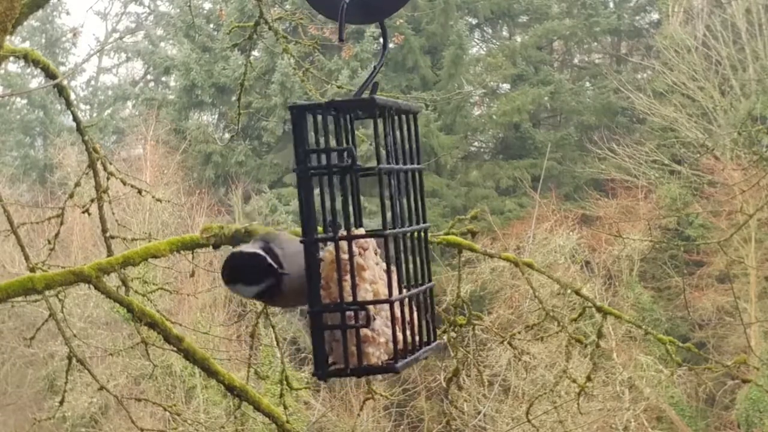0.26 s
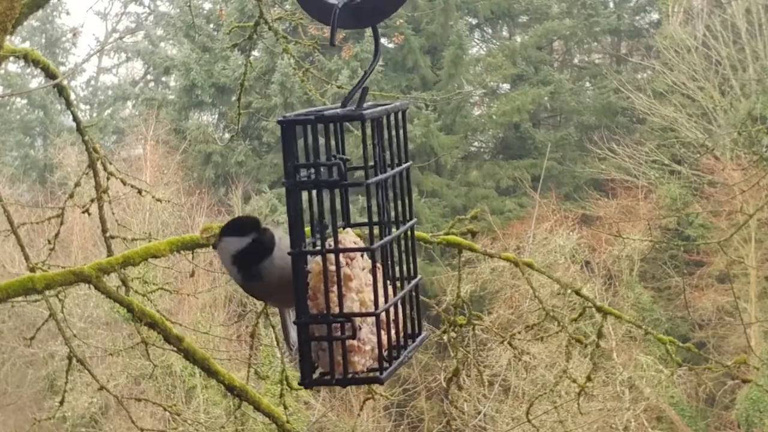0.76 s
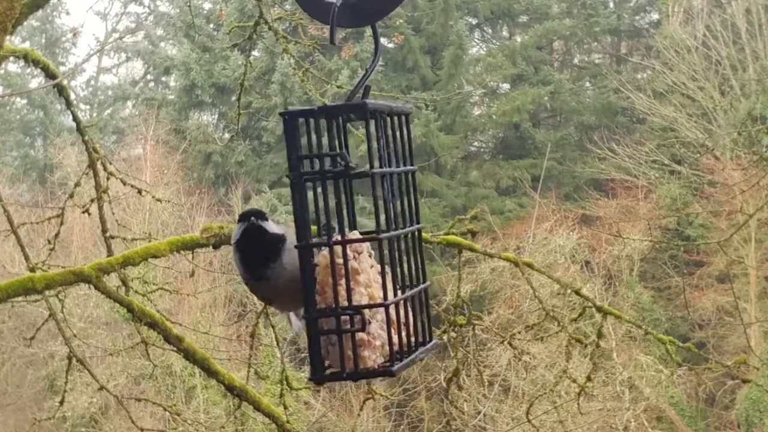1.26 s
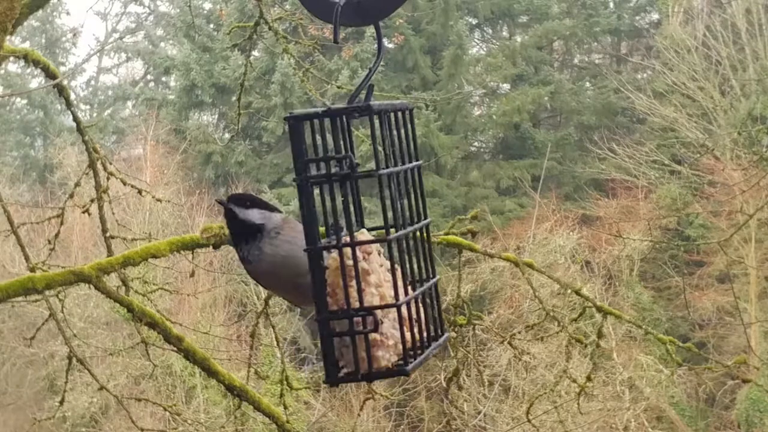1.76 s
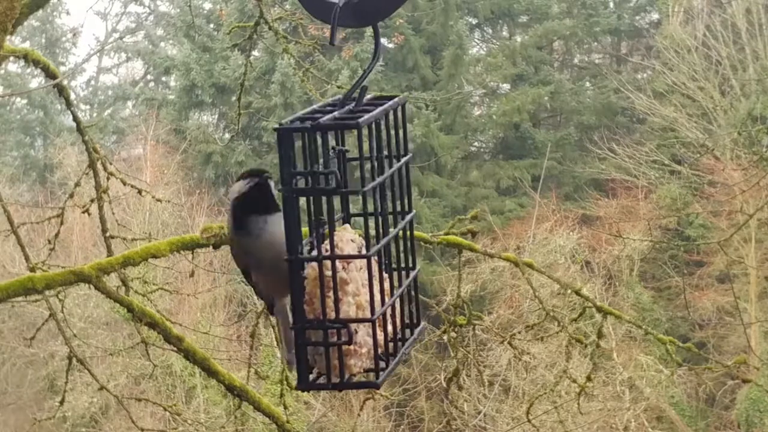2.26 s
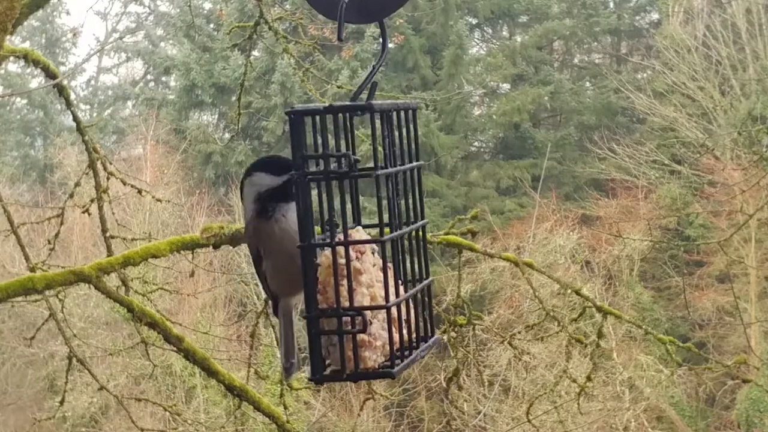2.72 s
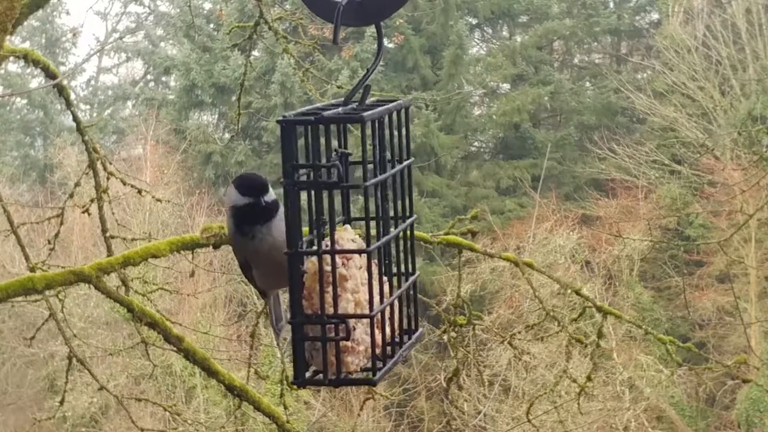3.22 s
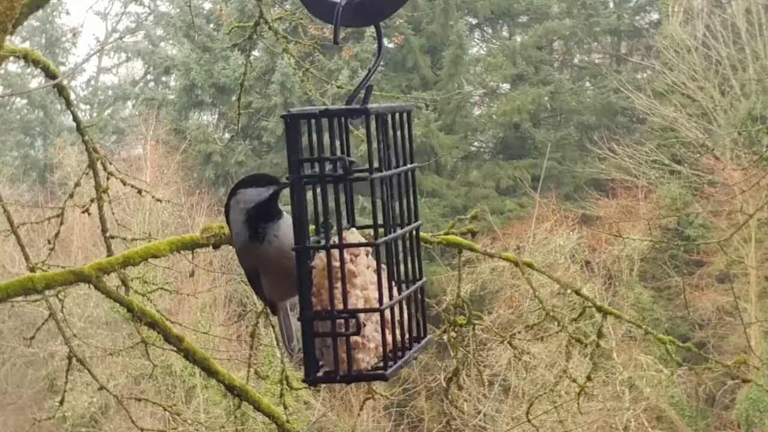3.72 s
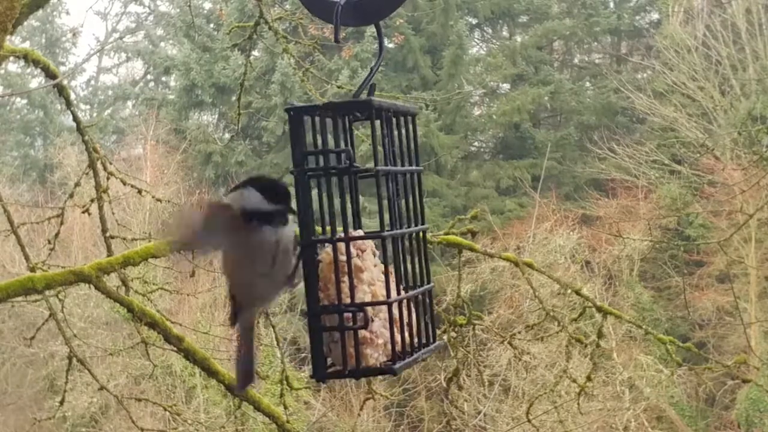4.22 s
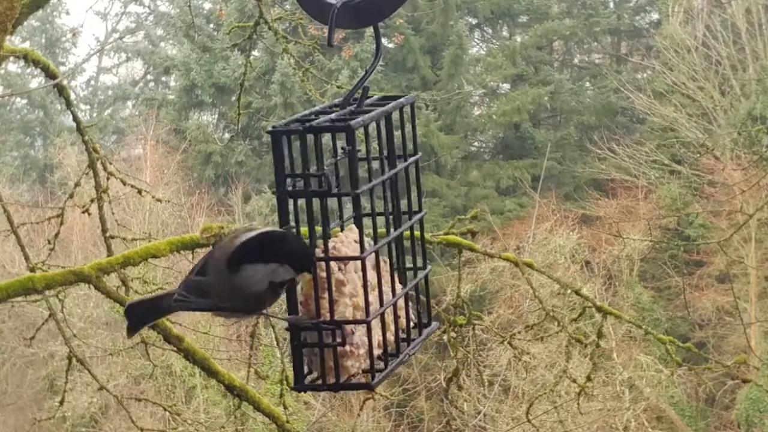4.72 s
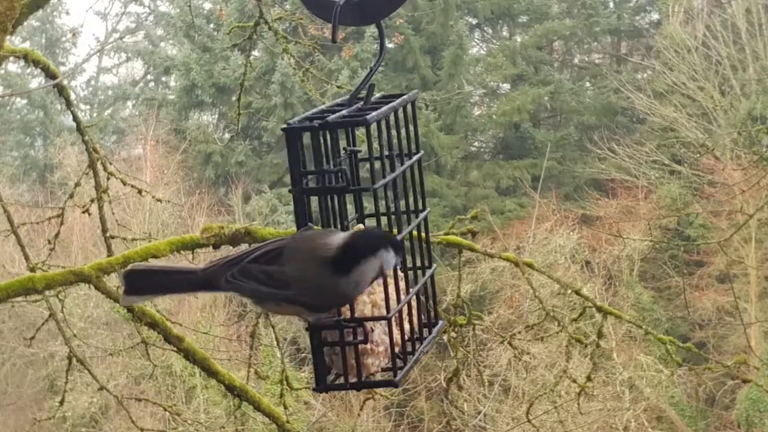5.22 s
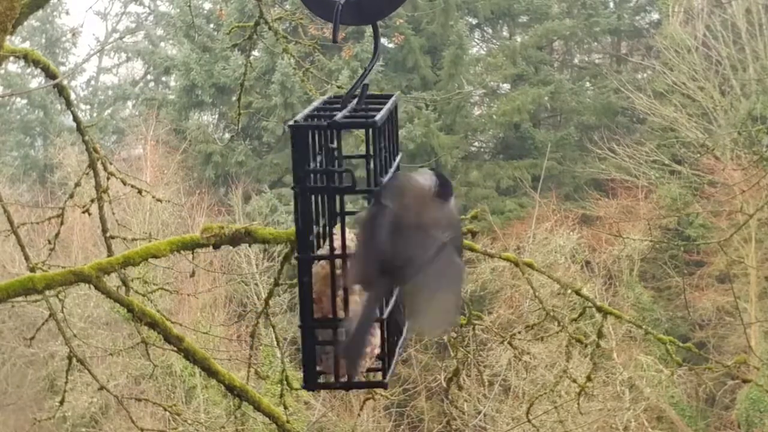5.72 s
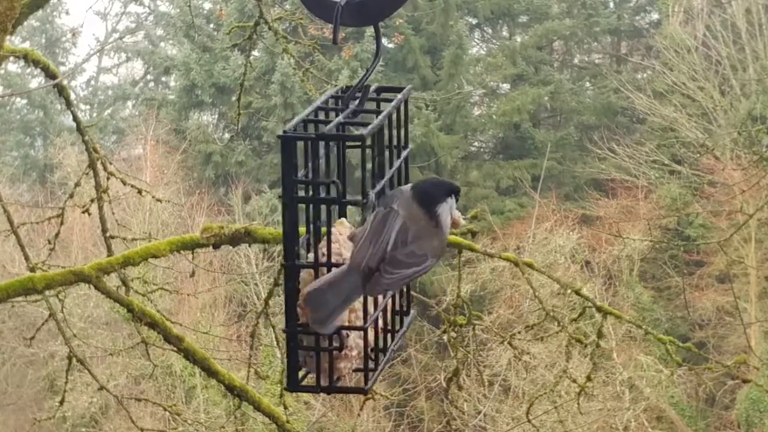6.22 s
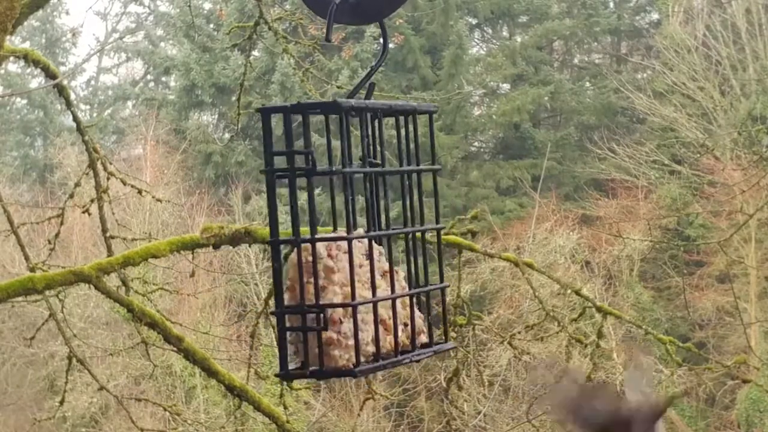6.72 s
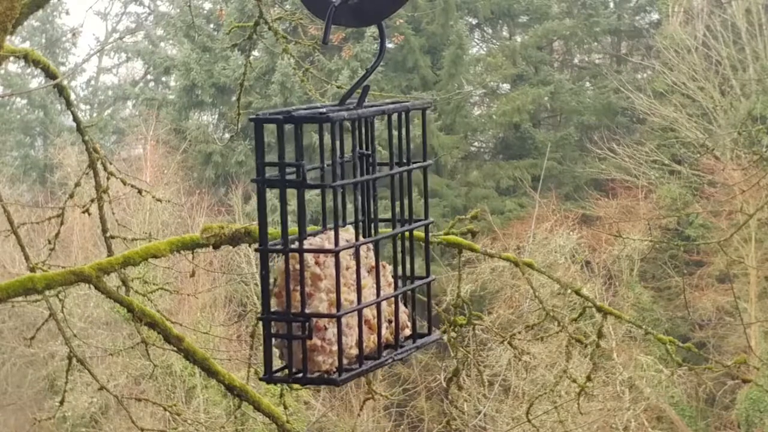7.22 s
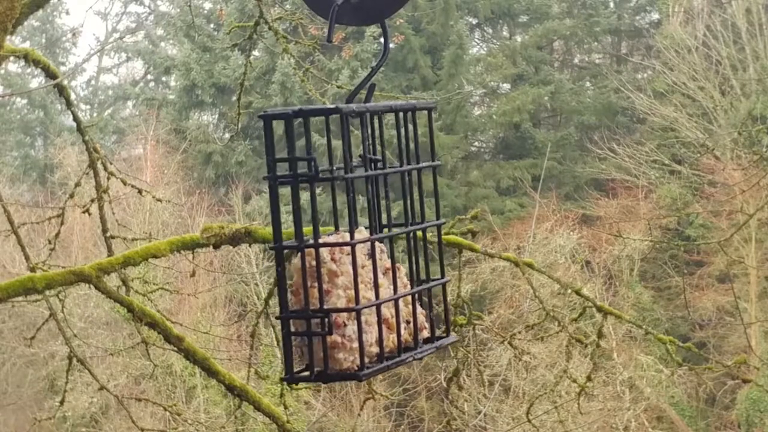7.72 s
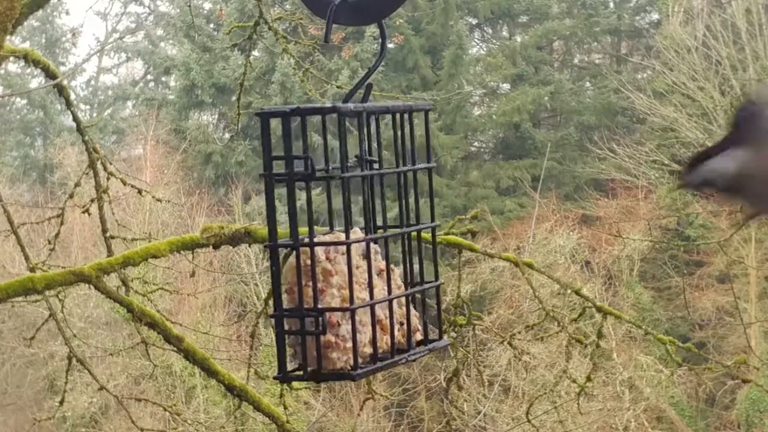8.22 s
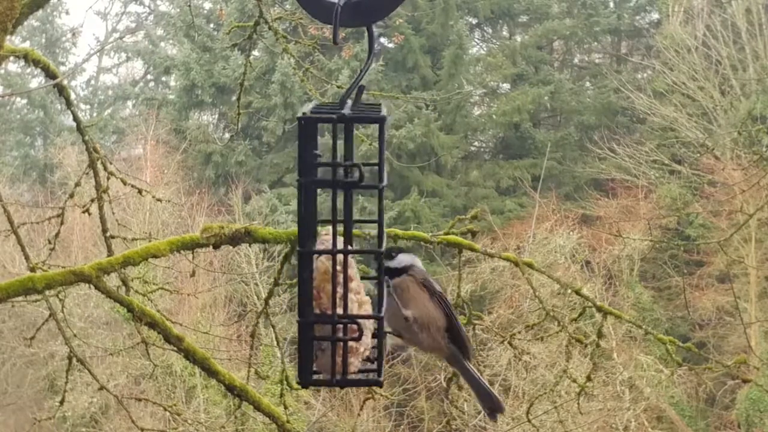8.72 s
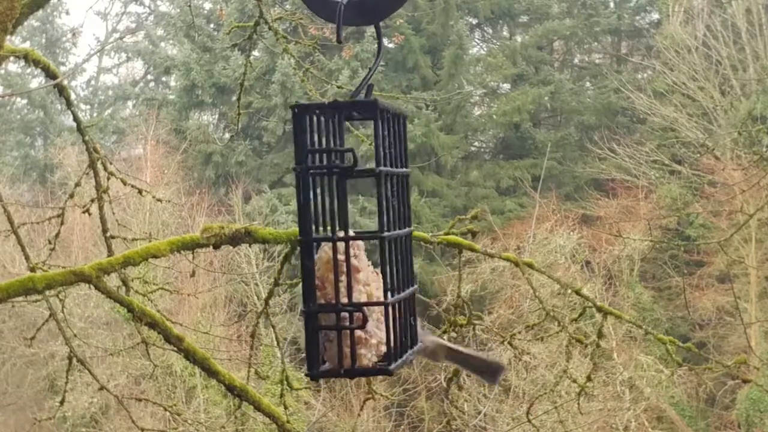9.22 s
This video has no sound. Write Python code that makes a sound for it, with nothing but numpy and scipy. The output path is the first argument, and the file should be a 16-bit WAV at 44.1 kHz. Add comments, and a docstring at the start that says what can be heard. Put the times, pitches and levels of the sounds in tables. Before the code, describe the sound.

Over the steady low roar of a far road, small birds close to the microphone sound thin, high notes, a brief gargle ending in a trill and whistle, and light ticks among trees. Occasional dull knocks on the microphone's housing come in between. The calls stop a little past halfway, leaving faint feather rustles on a wire cage and the swelling noise of a car drawing nearer.

```python
"""Chickadees at a suet cage in a wood

The birds' syrinxes sound thin tsit notes, sharp ticks and one gargled phrase, and the trees scatter
a brief echo. Claws and wings rustle on the wire, and soft knocks ring the shell of a nearby camera,
whose two microphone ports hear the scene. Behind, a distant road roars steadily as broadband noise;
one car passes far off, and towards the end another draws nearer."""
import sys
import numpy as np
from scipy import signal
from scipy.fft import rfft, irfft, next_fast_len
from scipy.io import wavfile
from scipy.ndimage import map_coordinates

SR = 44100
rng = np.random.default_rng(int(sys.argv[2]) if len(sys.argv) > 2 else 0)


def store_wav(level_fs):
    """Save 16-bit WAV to argv[1]."""
    pcm = np.round(np.clip(np.atleast_2d(level_fs), -1, 1) * 32767)
    wavfile.write(sys.argv[1], SR, pcm.T.astype(np.int16))


N = 417186

# Friction spectrum of feathers: frequency_hz, density_db
FEATHER_SPECTRUM = [(2500, -30), (4000, -6.5), (5500, -10), (7400, -3), (8900, -13), (10500, -4.5),
                    (13000, 0), (15000, -13)]
# Treble noise at the two ports: frequency_hz, left_over_right_db, coherence, left_lead_rad
TREBLE_PORTS = [(5195, -0.5, 0.00752, 0.0033), (7180, 4.5, 0.0028, 0.0066), (10240, 1.5, 0.0043, 0.0027),
                (12870, -9.5, 0.004, 0.0022)]


def amp(db):
    """Amplitude ratio of a level in decibels."""
    return 10 ** (np.asarray(db) / 20)


def unit(x):
    """Normalisation to an rms of 1."""
    return x / np.sqrt(np.mean(x ** 2) + 1e-20)


def along(points, hz):
    """Interpolation of each column of (frequency_hz, ...) rows on a logarithmic frequency axis."""
    knots_hz, *columns = np.transpose(points)
    return np.array([np.interp(np.log(hz + 1), np.log(knots_hz + 1), c) for c in columns])


def wobble(knots_per_s, size):
    """Smooth random modulation: a spline through Gaussian values."""
    knots = rng.standard_normal(int(size * knots_per_s / SR) + 4)
    return map_coordinates(knots, [np.arange(size) * knots_per_s / SR])


def filtered(x, response):
    """Linear filtering: the spectrum is multiplied by a frequency response."""
    size = next_fast_len(x.shape[-1] + 8192)
    return irfft(rfft(x, size) * response(np.fft.rfftfreq(size, 1 / SR)), size)[..., :x.shape[-1]]


def add(track, start_s, sound):
    """Superposition of a sound on a track."""
    part = track[:, max(round(start_s * SR), 0):][:, :sound.shape[-1]]
    part += sound[..., :part.shape[-1]]


def port_noise(spectrum, ports, ripple_db=1.5):
    """Partially coherent coloured noise at the two ports; their mean has an rms of 1."""
    size = next_fast_len(N)
    hz = np.fft.rfftfreq(size, 1 / SR)
    common, independent = rfft(rng.standard_normal((2, size)))
    balance_db, coherence, lead_rad = along(ports, hz)
    coherence, ratio = np.clip(coherence, 0, .995), amp(balance_db)
    left = ratio * np.exp(1j * lead_rad) * common
    right = coherence * common + np.sqrt(1 - coherence ** 2) * independent
    sum_gain = np.sqrt(1 + ratio ** 2 + 2 * ratio * coherence * np.cos(lead_rad))
    skirts = np.minimum(hz / spectrum[0][0], 1) ** 6 / np.maximum(hz / spectrum[-1][0], 1) ** 20
    # reflections from ground and trunks ripple the spectrum
    colour = amp(along(spectrum, hz) + ripple_db * wobble(100.35, len(hz))) * skirts
    pair = irfft(np.array([left, right]) * colour / sum_gain, size)[:, :N]
    return pair / np.std(pair.mean(axis=0))


def passing(closest_s, distance_s, peak_db, trees_db_per_s=1.2):
    """Spherical spreading and screening by trees set a car's gain; distance is in seconds of travel."""
    range_s = np.hypot(np.arange(N) / SR - closest_s, distance_s)
    return amp(peak_db - trees_db_per_s * (range_s - distance_s)) * distance_s / range_s


def traffic(rumble_db=-41.5, roar_db=-35, tyre_db=-59):
    """Incoherent sources add in power: a steady road, a far car, then a near one with brighter tyres."""
    # Spectra of engine rumble, road roar, tyre hiss and tread sizzle: frequency_hz, density_db
    engine = [(32, -14), (45, -5.5), (60, -1.5), (74, -3), (87, 3.5), (98, -5.5), (130, -6), (185, -13.5),
              (230, -7), (300, -25.5)]
    far_roar = [(170, -35), (255, -13.5), (300, -7.5), (350, -9.5), (410, -6), (490, -10.5), (540, -3.5),
                (620, -2.2), (670, 2.04), (735, 1.3), (800, -2.5), (860, -6.5), (930, -7.5), (1020, -19.5),
                (1300, -64.5)]
    near_roar = [(170, -8.5), (250, -10.5), (310, -4), (380, -4.5), (475, 0.7), (560, -1), (610, 2.5),
                 (680, -2), (735, -4.5), (810, -5), (900, -12.5), (1050, -16), (1300, -44)]
    far_tyres = [(850, -38), (1080, 6), (1220, -4), (1400, -1.5), (1520, -8), (1700, -0.5), (1820, -8.5),
                 (1980, -4.5), (2500, -15), (3000, -25), (4000, -55.5), (5200, -55.5), (7500, -44)]
    near_tyres = [(850, -18), (1060, 4.5), (1250, 2), (1500, -1.5), (1740, -4), (2050, -2), (2380, -5.5),
                  (2900, -17), (4000, -31), (5200, -29), (7500, -26.5), (10500, -42.5), (13000, -41)]
    near_tread = [(1700, -10), (2250, 15.5), (2900, -5.5), (3400, -6.5), (3950, 1), (4600, -6.5),
                  (5400, -13), (6500, -3.5), (7500, -7), (9000, -20.5), (12500, -12.5)]
    # Paths to the two ports: frequency_hz, left_over_right_db, coherence, left_lead_rad
    far_ports = [(60.0, 2.4, 0.99, -0.0), (300.0, 2.4, 0.99, -0.1), (430.0, 2.9, 0.94, -0.1),
                 (580.0, 9.2, 0.82, -0.2), (700.0, 12.7, 0.64, 0.5), (820.0, 13.4, 0.49, -2.0),
                 (1100.0, 5.5, 0.4, -4.0), (1500.0, 6.7, 0.69, -4.0), (2200.0, 1.8, 0.44, -6.3),
                 (3000.0, 1.1, 0.18, -9.5), (7000, -2, 0.1, -9.5)]
    near_ports = [(60.0, 2.2, 0.99, -0.1), (300.0, 2.4, 0.98, -0.2), (430.0, 5.9, 0.92, -0.4),
                  (580.0, 9.8, 0.62, -1.9), (700.0, 7.2, 0.73, -2.4), (820.0, 3.9, 0.82, -2.8),
                  (1100.0, 3.1, 0.59, -3.0), (1500.0, 2.4, 0.37, -3.6), (2200.0, 5.2, 0.5, -6.4),
                  (3000.0, 1.9, 0.36, -3.4), (5200.0, -0.9, 0.09, -3.4), (7300.0, -7.2, 0.16, -3.4)]
    rumble_gain = np.hypot(amp(rumble_db), passing(closest_s=9.365, distance_s=.854, peak_db=-38))
    rumble = rumble_gain * port_noise(engine, far_ports, ripple_db=.5)
    roar_gain = np.hypot(amp(roar_db), passing(4.73, 2.03, -30.5))
    roar = roar_gain * port_noise(far_roar, far_ports, ripple_db=-.5)
    roar += passing(9.35, .69, -24) * port_noise(near_roar, near_ports, ripple_db=1)
    tyre_gain = np.hypot(amp(tyre_db), passing(5.27, 3.2, -48.5))
    tyres = tyre_gain * port_noise(far_tyres, far_ports, ripple_db=3.5)
    tyres += passing(9.13, 1.58, -43) * port_noise(near_tyres, near_ports, ripple_db=2)
    # the fine sizzle of the tread carries only once the car is close
    tread = passing(9.68, .313, -41.5) * port_noise(near_tread, near_ports)
    waver = amp(.7 * wobble(12, N))
    return rumble + waver * roar + tyres + tread


def hiss(level_db=-67.5):
    """A faint floor of stationary treble noise, almost incoherent between the ports."""
    # Spectrum of the hiss: frequency_hz, density_db
    spectrum = [(2500, 6.5), (3800, 6.5), (5400, -2.5), (7500, 2), (8900, -3), (10400, -5), (12500, 2),
                (13600, -6)]
    return amp(level_db) * port_noise(spectrum, TREBLE_PORTS)


def syrinx(hz, db, overtone_db, jitter, rough=0, second_voice=0, beat_hz=0):
    """A harmonic oscillator: random modulation roughens it, and a second voice beats against it."""
    size = len(hz)
    pull_rad, beat_drift, flutter_per_s = .22, .06, 2400
    hz = hz * (1 + jitter * wobble(650, size))
    beat_phase = 2 * np.pi * np.cumsum(beat_hz * (1 + beat_drift * wobble(400, size))) / SR
    # the two voices bend each other's phase
    coupling = np.exp(1j * second_voice * pull_rad * signal.sawtooth(beat_phase, .2))
    beat = (1 + second_voice * np.exp(1j * beat_phase)) * coupling
    voice = np.exp(2j * np.pi * np.cumsum(hz) / SR) * beat
    flutter = wobble(flutter_per_s, size) + 1j * wobble(flutter_per_s, size)
    grain = (1 + rough * flutter) / np.sqrt(1 + 2 * rough ** 2)
    tone = sum(amp(level) * np.imag(grain * voice ** k) * (k * hz < SR / 2)
               for k, level in enumerate([0, *overtone_db], 1))
    return np.sqrt(2) * amp(db) * tone * signal.windows.tukey(size, .04)


def in_woods(note, pan_db, lead_rad, echo_db, twig_t60_s=.04, near_t60_s=.15, trunk_t60_s=.39):
    """Direct sound, early reflections and scattering by trees; positive pan and lead favour the left."""
    # Reflections from cage and branch: delay_s, level_db
    surfaces = [(.0037, -8), (.0092, -7)]
    t = np.arange(int(.35 * SR)) / SR
    twigs = amp(4 - 60 * t / twig_t60_s)
    trunks = amp(echo_db - 13 - 60 * t / trunk_t60_s)  # the long tail belongs to distant birds
    decay = (twigs + amp(-60 * t / near_t60_s) + trunks) * (t > .0015)
    tail = rng.standard_normal((2, len(t))) * decay / np.linalg.norm(decay)
    for delay_s, db in surfaces:
        tail[:, round(delay_s * rng.uniform(.85, 1.15) * SR)] += amp(db)
    tail = filtered(tail, lambda hz: 1 / np.sqrt(1 + (hz / 13000) ** 10))  # air and leaves absorb
    sides = amp(np.array([[pan_db], [-pan_db]]) / 2)
    direct = np.real(signal.hilbert(note) * np.exp(.5j * np.array([[lead_rad], [-lead_rad]])))
    heard = amp(echo_db) * signal.fftconvolve(note[None], tail, axes=1) * unit(np.sqrt(sides))
    heard[:, :len(note)] += direct * unit(sides)
    return heard


def contact_calls(notes, contour, overtone_db, lead_rad, pure_below_db, cut_db_per_octave=45):
    """Frequency sweeps on one contour; the oscillation dies away below each note's lowest pitch."""
    out = np.zeros((2, N))
    for start_s, length_s, top_hz, low_hz, db, pan_db, echo_db, *manner in notes:
        pitch_ratio, swell_db, bright_db, rough = contour(length_s, *manner)
        hz = top_hz * pitch_ratio
        fade_db = cut_db_per_octave * np.minimum(np.log2(hz / low_hz), 0)
        purity_db = 2 * min(db - pure_below_db, 0)  # soft notes are purer
        overtones = [level + purity_db + bright_db for level in overtone_db]
        note = syrinx(hz, db + swell_db + fade_db, overtones, jitter=.006, rough=rough)
        add(out, start_s, in_woods(note, pan_db, lead_rad, echo_db))
    return out


def tsit_contour(length_s, dip_db, accent_db, rough, climb_per_s=2.3, plunge_s=.0046, end_ratio=.52):
    """Modulation of a tsit: the pitch climbs, eases off, then plunges with a rough accent."""
    t = np.arange(int(length_s * SR)) / SR
    late_s = t - (length_s - plunge_s)
    plunge = np.clip(late_s / plunge_s, 0, 1)
    pitch_ratio = 1 - climb_per_s * length_s * (1 - t / length_s) ** 2 - (1 - end_ratio) * plunge ** 1.22
    dip = np.exp(-((late_s + .0045) / .0033) ** 2)
    accent = np.exp(-(late_s / .0016) ** 2)
    attack_db = -30 * np.exp(-t / .001)
    swell_db = attack_db - dip_db * dip + accent_db * accent - 23 * plunge ** 4
    break_up = np.maximum(np.exp(np.minimum(late_s, 0) / .004), .2)
    return pitch_ratio, swell_db, 0, rough * break_up


def tsits():
    """Source and filter: the nearly closed beak favours the top of each thin note from the syrinx."""
    # Notes: start_s, length_s, top_hz, low_hz, level_db, pan_db, echo_db, dip_db, accent_db, roughness
    notes = [(.105, .0245, 7850, 6800, -19, -4, -15, 2, 1, .2),
             (.826, .023, 7700, 6100, -22.7, -5, -16, 3, -3, .3),
             (1.759, .0255, 7780, 6000, -25.5, -2, -13, 4, 3, .25),
             (2.325, .04, 7400, 6500, -69, 0, -2, 0, 0, .1), (2.405, .03, 7200, 6500, -67, 0, -2, 0, 0, .1),
             (2.815, .05, 7800, 6300, -42, -10, 0, 2, -3, .5),
             (3.547, .0245, 7700, 5400, -21.5, -5, -14, 9, 2, .3),
             (4.776, .010, 7500, 7100, -47, -4, -6, 0, 0, .1),
             (4.844, .011, 7400, 7100, -50, -4, -6, 0, 0, .1),
             (5.3155, .0245, 7780, 4200, -24, -2, -11, 4, 3, .45),
             (5.713, .047, 7800, 6000, -37, -11, -4.5, 3, -3, .5)]
    # Response of the beak: frequency_hz, gain_db
    beak = [(4200, -1), (5200, -3.5), (6200, -4), (7200, -1), (7800, 1), (8400, -9), (9200, -4), (10400, 6),
            (12000, -1), (13600, -4), (15300, 2)]
    source = contact_calls(notes, tsit_contour, overtone_db=[-22.5], lead_rad=-1.9, pure_below_db=-30)
    return filtered(source, lambda hz: amp(along(beak, hz)))


def knocks(shell_hz=670, rise_s=.0016, ring_db=-17, t60_s=.073):
    """Damped resonance: each soft knock rings the camera's shell, mostly on the left."""
    # Impacts on the shell: start_s, level_db
    impacts = [(0.327, -9), (1.9785, -13.5), (4.866, -16), (5.602, -16.5), (6.556, -18), (9.402, -7)]
    out, t = np.zeros((2, N)), np.arange(SR // 20) / SR
    push = (t / rise_s) ** 2 * np.exp(2 - 2 * t / rise_s)
    ring = (push + amp(ring_db - 60 * t / t60_s)) * np.sin(2 * np.pi * shell_hz * t)
    for start_s, db in impacts:
        add(out, start_s, amp(db) * amp([[0], [-12]]) * ring)
    return out


def slur(crest_s, open_hz, mid_hz, crest_hz, open_db, mid_db, crest_db, scoop):
    """A modulated whistle: an accent scooped from below, a dip, a rising flick and a harsh plunge."""
    attack_s, scoop_s, flick_s, fall_s, end_ratio = .0041, .0012, .003, .0079, .63
    end_s = crest_s + fall_s
    t = np.arange(int(end_s * SR)) / SR
    hz = np.interp(t, [attack_s, crest_s - flick_s, crest_s], [open_hz, mid_hz, crest_hz])
    fall = np.clip((t - crest_s) / fall_s, 0, 1)
    hz *= (1 - scoop * np.exp(-t / scoop_s)) * end_ratio ** (fall * (2 - fall))
    db = np.interp(t, [0, attack_s, (attack_s + crest_s - flick_s) / 2, crest_s, end_s],
                   [open_db - 20, open_db, mid_db, crest_db, crest_db - 52])
    return syrinx(hz, db, overtone_db=[-15 + 35 * fall], jitter=.017, rough=.09 + .32 * np.sqrt(fall))


def squeak(length_s, first_hz, last_hz, db, third_db, fade_db=-9):
    """A linear frequency glide: a brief, hollow squeak as the voice cracks at the start of a slur."""
    progress = np.linspace(0, 1, int(length_s * SR))
    hz = first_hz + (last_hz - first_hz) * progress
    return syrinx(hz, db + fade_db * progress, overtone_db=[-16, third_db], jitter=.012, rough=.12)


def cluck(length_s, first_hz, last_hz, db, swing, rasp_hz=195, throb_db=12, attack_s=.0037):
    """Sawtooth modulation breaks a fading glide into steep little falls, loudest halfway down."""
    t = np.arange(int(length_s * SR)) / SR
    rasp = signal.sawtooth(2 * np.pi * rasp_hz * t, .1)
    hz = first_hz * (last_hz / first_hz) ** (t / length_s) * (1 + swing * rasp)
    fade_db = np.interp(t, [0, attack_s, length_s], [-14, 0, -14])
    pulse_db = throb_db * min(10 * swing, 1) * (.5 - np.abs(rasp))
    return syrinx(hz, db + fade_db + pulse_db, overtone_db=[-18, -30], jitter=.02, rough=.12)


def held_contour(lead_s, swell_s, hold_s, release_s, hz, climb_hz_per_s, db, sharp_hz=173, settle_s=.0078):
    """Pitch and level of a sustained oscillation that starts soft and sharp, settles, swells and climbs."""
    stages_s = np.cumsum([lead_s, swell_s, hold_s, release_s])
    t = np.arange(int(stages_s[-1] * SR)) / SR
    pitch_hz = hz + climb_hz_per_s * t + sharp_hz * np.exp(-t / settle_s)
    waver_db = .7 * wobble(45, len(t))
    envelope_db = np.interp(t, stages_s, [-15, 0, 0, -21]) - 10 * np.exp(-t / .003)
    return pitch_hz, db + waver_db + envelope_db


def gargle():
    """Source and filter: slurs, squeaks, clucks, a beating trill and a whistle share one tone colour."""
    # Opening slurs: start_s, crest_s, open_hz, mid_hz, crest_hz, open_db, mid_db, crest_db, scoop_ratio
    slurs = [(1.197, .0325, 6860, 7300, 8400, -14.5, -21, -13, .015),
             (1.291, .030, 9100, 7350, 8170, -15, -29, -4.5, 0.2),
             (1.383, .012, 5360, 5867, 7000, -31, -42, -11.5, 0)]
    # Squeaks that join them: start_s, length_s, first_hz, last_hz, level_db, third_partial_db
    squeaks = [(1.1975, .013, 3400, 3500, -41, 2), (1.2915, .006, 5300, 7200, -23, -30),
               (1.383, .011, 5400, 5900, -31, -30)]
    # Low raspy clucks: start_s, length_s, first_hz, last_hz, level_db, swing_ratio
    clucks = [(1.361, .010, 4000, 3500, -35, .15), (1.371, .021, 3900, 2800, -43, .02),
              (1.402, .007, 3700, 2900, -48, .02), (1.408, .009, 2700, 2000, -40, .02),
              (1.412, .006, 4200, 2700, -46, .02), (1.4205, .005, 2800, 1900, -37, .02),
              (1.423, .021, 3300, 3300, -41, .25), (1.5445, .013, 4500, 4000, -38, .22),
              (1.556, .016, 3000, 2200, -43, .2)]
    # Trill and whistle: start_s, lead_s, swell_s, hold_s, release_s, pitch_hz, climb_hz_per_s, level_db
    held_notes = [(1.444, 0.011, 0.033, 0.022, 0.0275, 3280, 100, -29.5),
                  (1.574, 0.029, .016, 0.057, 0.018, 3197, 1190, -30)]
    # Tone colour of the gargle as heard at the two ports: frequency_hz, left_db, right_db
    tone_colour = [(2000, 3, 3), (5000, 2, 1.5), (7600, -2, -1.5), (8200, -5, -8), (8800, -8, -15),
                   (10500, -2, -14), (11800, 3, -8), (12600, -6, -18), (13600, -27, -27), (15400, -24, -22)]
    out = np.zeros((2, N))
    for start_s, *row in squeaks:
        add(out, start_s, in_woods(squeak(*row), pan_db=-4, lead_rad=-3.1, echo_db=-13))
    for start_s, *row in slurs:
        add(out, start_s, in_woods(slur(*row), pan_db=-8, lead_rad=-2.2, echo_db=-9))
    for start_s, *row in clucks:
        add(out, start_s, in_woods(cluck(*row), pan_db=-4, lead_rad=-1.8, echo_db=-7))
    (trill_s, *trill_row), (whistle_s, *whistle_row) = held_notes
    trill = syrinx(*held_contour(*trill_row), overtone_db=[-21, -33], jitter=.006, rough=.03,
                   second_voice=.85, beat_hz=322)
    add(out, trill_s, in_woods(trill, pan_db=-4, lead_rad=-1.65, echo_db=-15))
    whistle = syrinx(*held_contour(*whistle_row), overtone_db=[-18, -19], jitter=.003)
    add(out, whistle_s, in_woods(whistle, pan_db=1, lead_rad=-1.9, echo_db=-15))
    return filtered(out, lambda hz: amp(along(tone_colour, hz)))


def tick_contour(length_s, rough):
    """Modulation of a tick: one steep fall in pitch that grows rougher on the way down."""
    # Course of the fall: progress, pitch_ratio, level_db, overtone_db
    shape = [(0, .94, -28, -20), (.18, 1, -4, -20), (.4, .85, 4, -16), (.62, .56, 0, 1), (.8, .4, -10, 3),
             (1, .19, -13, -3)]
    knots, *columns = np.transpose(shape)
    progress = np.linspace(0, 1, int(length_s * SR))
    pitch_ratio, swell_db, bright_db = (np.interp(progress, knots, c) for c in columns)
    return pitch_ratio, swell_db, bright_db, rough * np.minimum(2 * progress, 1)


def ticks():
    """A sweep of the syrinx across a wide band in milliseconds is heard as a sharp tick."""
    # Notes: start_s, length_s, top_hz, low_hz, level_db, pan_db, echo_db, roughness
    notes = [(2.1935, .014, 8900, 1500, -40.5, -7.5, -6, .7),
             (3.040, .0135, 8900, 2600, -44.5, -.5, -5, .6), (3.673, .0145, 9000, 2600, -39, -7, -6, .6),
             (4.119, .014, 8700, 2600, -44, -8, -8, .7), (5.333, .009, 7600, 3900, -37, -2, -5, .7),
             (5.549, .0135, 8900, 2800, -45.5, 0, -5.5, .6), (5.715, .007, 7800, 3990, -51, 0, -6, .5),
             (6.128, .008, 8490, 3300, -52, 0, -9, .5)]
    return contact_calls(notes, tick_contour, overtone_db=[-10, -20], lead_rad=1.8, pure_below_db=-48)


def rustles(t60_s=.14, rise_s=.0024, gain_db=-7):
    """Friction noise: claws and wing tips brush the wire cage in brief, decaying puffs."""
    # Touches on the wire: time_s, relative_db
    touches = [(4.7683, -54.5), (4.8386, -50), (5.622, -54), (6.715, -55), (6.7559, -56), (6.8352, -51),
               (6.8754, -55)]
    envelope, t = np.zeros((1, N)), np.arange(SR // 8) / SR
    attack = 1 - np.exp(-t / rise_s)
    for time_s, db in touches:
        add(envelope, time_s - rise_s, amp(db + gain_db - 60 * t / t60_s) * attack)
    return envelope * port_noise(FEATHER_SPECTRUM, TREBLE_PORTS)


def flights(wingbeat_hz=24, flutter_db=1.0, cutoff_hz=7500):
    """Wingbeats modulate the amplitude of a soft feather hiss as a bird flies off or lands."""
    # Gaussian swells of wing noise: centre_s, half_length_s, level_db
    whirrs = [(6.946, 0.28, -64), (8.432, 0.23, -60)]
    t = np.arange(N) / SR
    swell = sum(amp(db) * np.exp(-((t - centre_s) / half_s) ** 2 / 2) for centre_s, half_s, db in whirrs)
    feathers = port_noise(FEATHER_SPECTRUM, TREBLE_PORTS)
    air = filtered(feathers, lambda hz: 1 / np.sqrt(1 + (hz / cutoff_hz) ** 8))
    return swell * amp(flutter_db * np.sin(2 * np.pi * wingbeat_hz * t)) * unit(air)


def scene():
    """Superposition of birds and small noises in front, traffic and a faint hiss behind."""
    return tsits() + ticks() + gargle() + knocks() + rustles() + flights() + traffic() + hiss()


def record(dry):
    """Each port colours the treble; band-pass filtering removes the deepest bass and highest treble."""
    # Response of the ports: frequency_hz, left_db, right_db
    port_colour = [(8100, -3, -2.5), (8160, -5, 2), (8830, -5.5, -17.5), (9980, 9.5, -12.5),
                   (10370, 13.5, -8.5), (11980, -2.5, -13.5), (13460, -0.5, -12.5), (15207, 5, -12.5),
                   (15950, 0.5, -7.5)]
    bottom_hz, top_hz = 38, 15900
    low_cut = lambda hz: 1 / np.sqrt(1 + (bottom_hz / (hz + 1)) ** 8)
    top_cut = lambda hz: np.clip((top_hz - hz) / 300 + .5, 0, 1)
    return filtered(dry, lambda hz: amp(along(port_colour, hz)) * low_cut(hz) * top_cut(hz))


dry = scene()
out = record(dry)
store_wav(out)
```